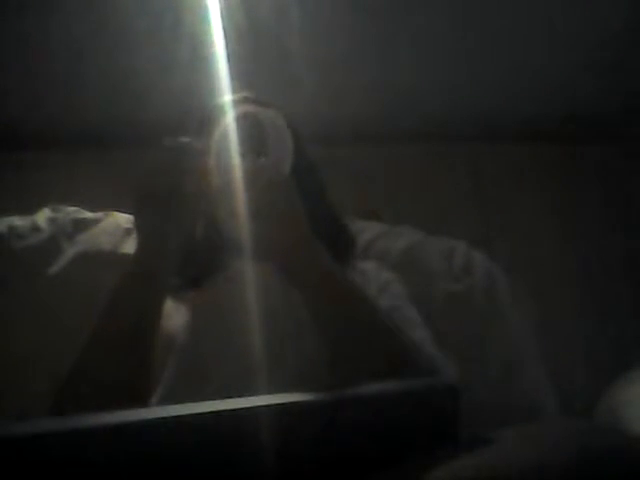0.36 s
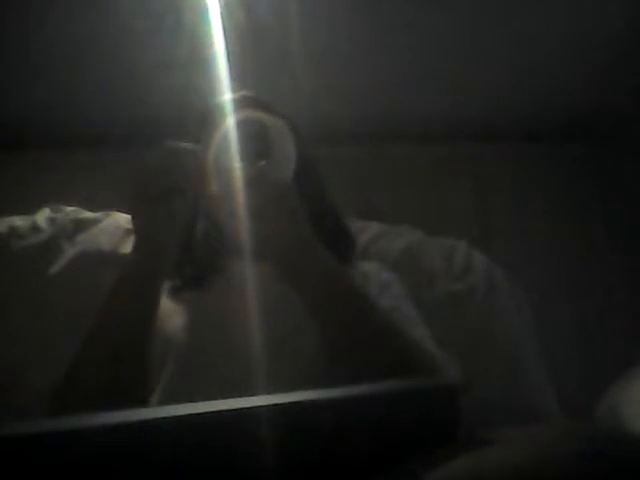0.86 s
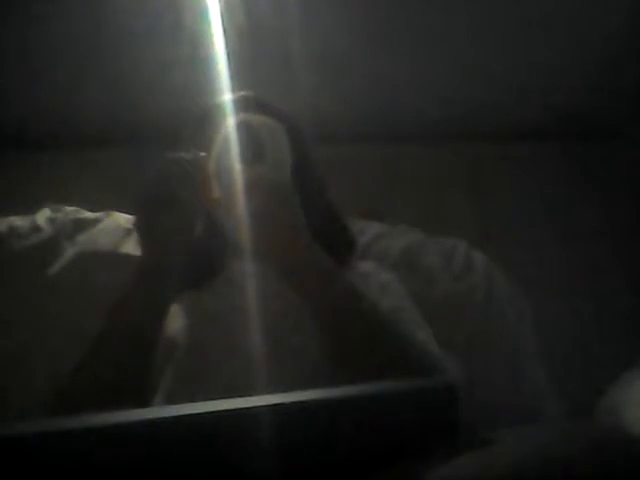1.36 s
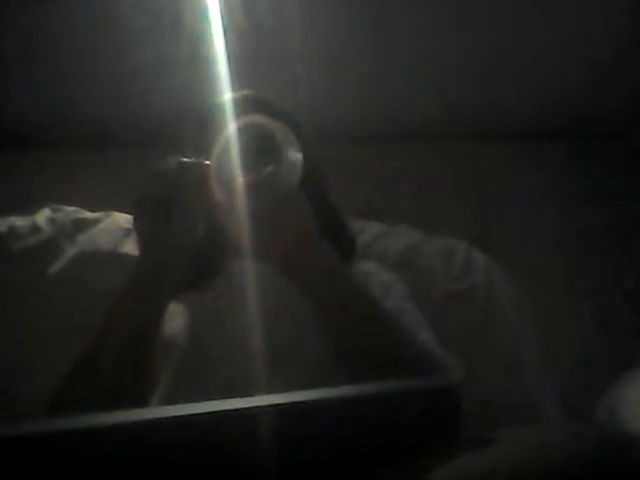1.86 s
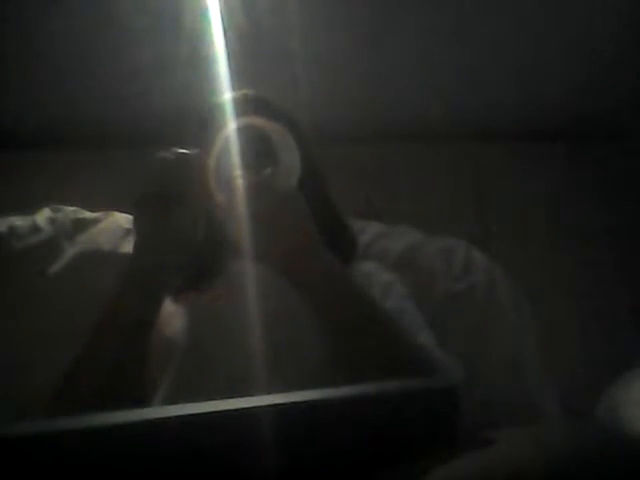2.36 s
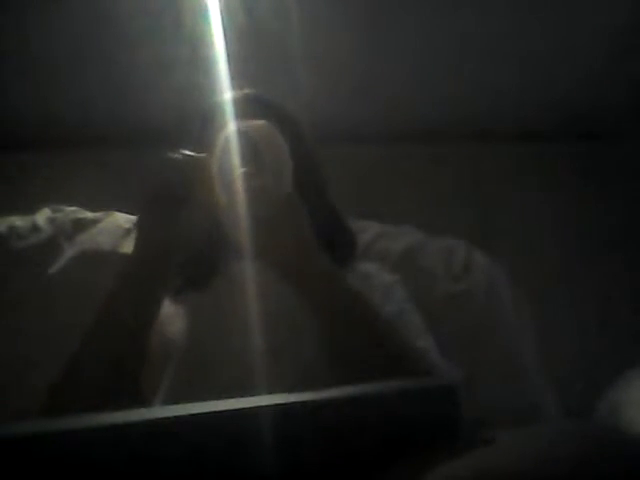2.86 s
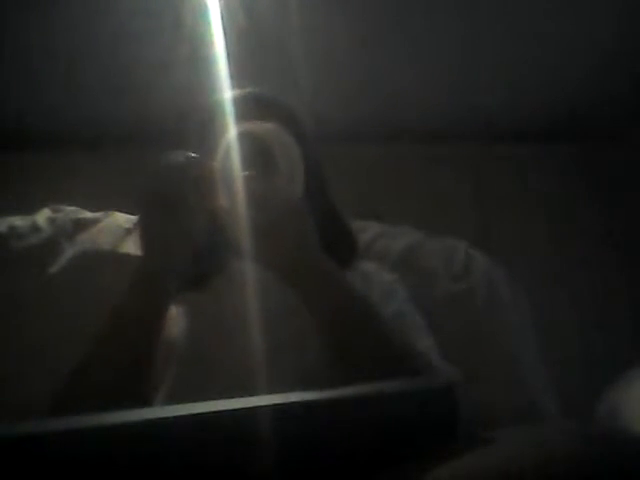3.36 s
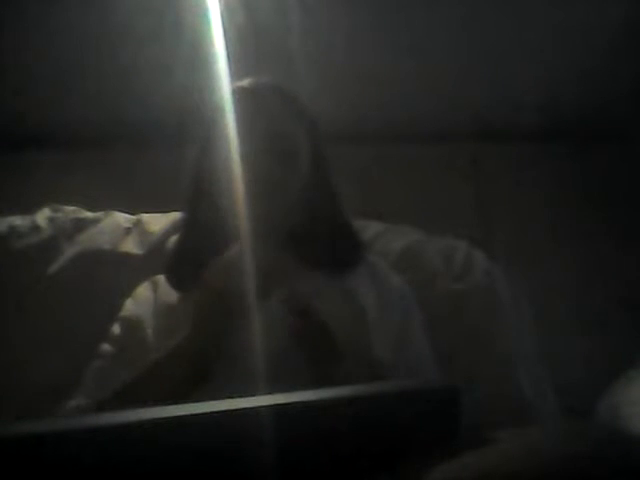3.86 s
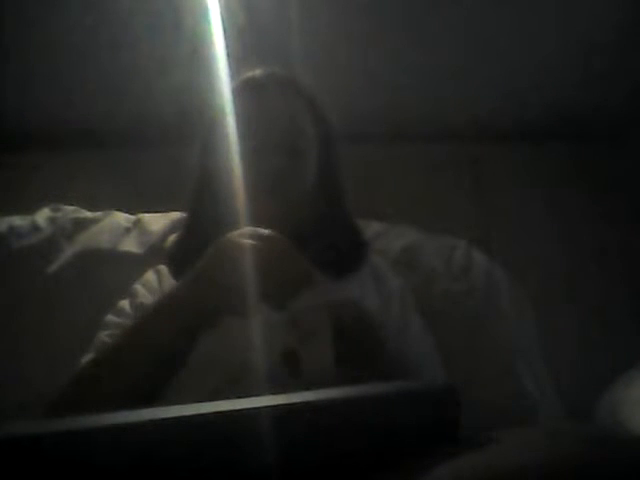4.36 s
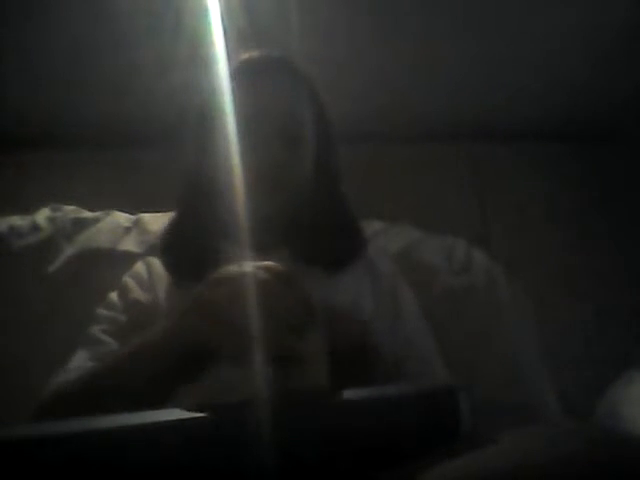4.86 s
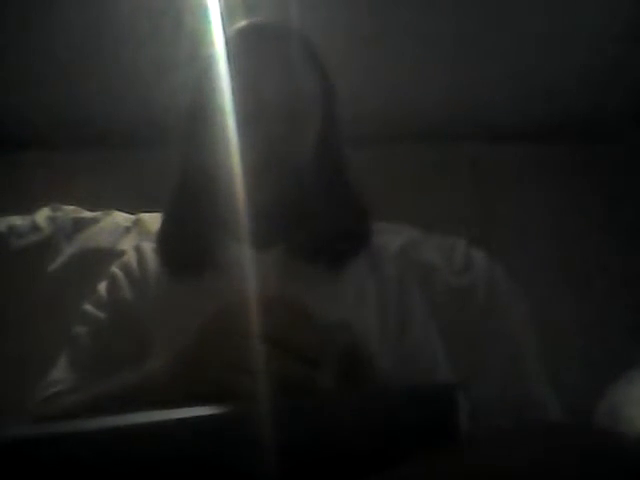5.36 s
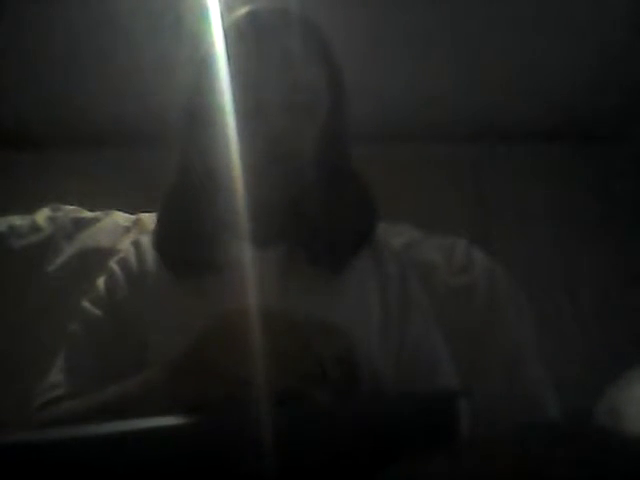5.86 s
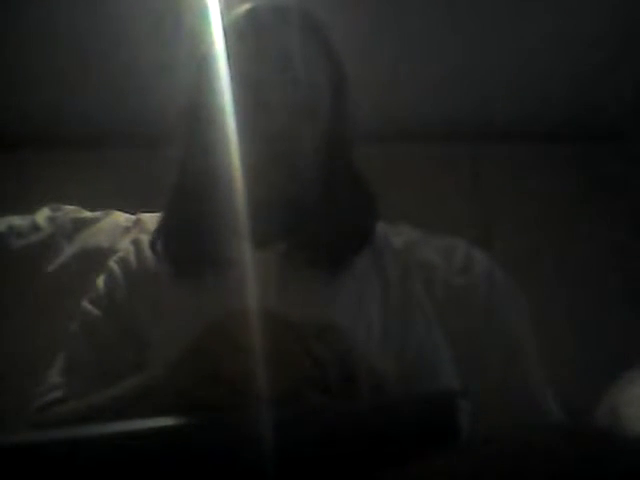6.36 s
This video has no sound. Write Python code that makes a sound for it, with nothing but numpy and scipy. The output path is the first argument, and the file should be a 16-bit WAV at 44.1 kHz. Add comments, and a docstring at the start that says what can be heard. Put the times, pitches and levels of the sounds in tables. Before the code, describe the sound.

Faint hiss and low hum, small tape clicks growing into crisp snips and one loud crackling snap, then light rustles and dull hollow knocks.

```python
"""A low hum and the hiss of a small two-port microphone run through a quiet room. Sticky tape is picked at,
peeled and snipped with scissors: each release of glue or bite of the blades is a noise burst that rings thin film
and tape roll, and a near wall throws it back. Faint rustles of loose film come among the snaps, and dense glue
crackle underlies three strong pulls. Then hands slide (random slips through resonances) and bump (decaying
modes and a rattle) on the hollow lap desk."""
import sys
import numpy as np
from scipy import signal
from scipy.fft import rfft, irfft, next_fast_len
from scipy.io import wavfile
from scipy.ndimage import uniform_filter1d

SR = 44100
rng = np.random.default_rng(int(sys.argv[2]) if len(sys.argv) > 2 else 0)


def makeup_ratio(level_db):
    """Linear amplitude ratio for a level in decibels (20 dB per factor of ten)."""
    decades = np.asarray(level_db, float) / 20
    return 10 ** decades


def store_pcm(level_fs):
    """Save levels as 16-bit WAV."""
    pcm = np.round(np.clip(level_fs, -1, 1) * 32767).astype(np.int16)
    wavfile.write(sys.argv[1], SR, np.atleast_2d(pcm).T)


N = 297410

# Broad spectrum of the thin film: (frequency [Hz], relative level [dB])
FILM_SPECTRUM = [(700, -43.5), (1500, -21), (3000, -14), (5000, -9.5), (6500, -4.5), (9300, -5),
                 (11500, -12.5), (14500, -10), (16000, -9.5), (16800, -34.5)]
# Modes of the tape roll: (frequency [Hz], width [Hz], relative level [dB])
ROLL_MODES = [(560, 126, -0.5), (1200, 360, -2), (1790, 240, -1.5), (2500, 1300, -2), (3310, 540, -2),
              (5000, 777, -2.5)]
# Modes of the hollow desk: (frequency [Hz], width [Hz], relative level [dB])
HOLLOW_MODES = [(520, 200, 5), (230, 120, 3.5), (386, 420, -1), (656, 170, -16.5)]
# Modes of the dry scrape on the desk: (frequency [Hz], width [Hz], relative level [dB])
SCRAPE_MODES = [(1250, 336, 6), (1580, 700, -2.5)]


def evened(x):
    """Power normalisation: scales to rms 1."""
    return x / np.sqrt(np.mean(x ** 2) + 1e-20)


def peaked(x):
    """Peak normalisation: scales to a largest magnitude of 1."""
    return x / abs(x).max()


def read(points, hz):
    """Interpolation of a spectrum on a logarithmic frequency axis."""
    f, value = np.transpose(points)
    return np.interp(np.log(hz + 1), np.log(f + 1), value)


def contour(tables, column=1, rest=-120.):
    """Piecewise-linear envelope: a column of several curves over time, at rest between them."""
    out = np.full(N, rest)
    for rows in tables:
        rows = np.array(rows)
        at = np.arange(round(rows[0, 0] * SR), min(round(rows[-1, 0] * SR), N))
        out[at] = np.interp(at / SR, rows[:, 0], rows[:, column])
    return out


def add(mix, s, sound):
    """Superposition: adds a sound to the mix in place, from time s."""
    part = mix[round(s * SR):][:len(sound)]
    part += sound[:len(part)]


def resonate(x, hz, width):
    """Resonance: one complex pole with a gain near 1 at its centre."""
    r = np.exp(-np.pi * width / SR)
    return 2 * signal.lfilter([1 - r], [1, -r * np.exp(2j * np.pi * hz / SR)], x).real


def ring(x, modes):
    """Modal superposition: two resonances in series for each mode leave dark valleys between modes."""
    body = 0
    for hz, width, db in modes:
        body = body + makeup_ratio(db) * resonate(resonate(x, hz, width), hz, 2 * width)
    return evened(body)


def coloured(x, points):
    """Minimum-phase filtering: the Hilbert transform of log gain gives a causal response."""
    hz = abs(np.fft.fftfreq(2048, 1 / SR))
    log_gain = np.log(makeup_ratio(np.maximum(read(points, hz), -80)))
    taps = np.fft.ifft(np.exp(np.conj(signal.hilbert(log_gain)))).real[:512]
    return signal.oaconvolve(x, taps)[:len(x)]


def clicks(per_s, spread_db):
    """Random impulse process: a few clicks much larger than the rest, power independent of the rate."""
    size = makeup_ratio(spread_db * np.minimum(rng.exponential(1, N), 4))
    strength = size * rng.standard_normal(N)
    occurs = rng.random(N) < per_s / SR
    return evened(strength * occurs / np.sqrt(per_s))


def swell(top_s, top_db, rise_s, fall_s):
    """Exponential growth and decay: gain climbs to its top and falls away, straight in dB."""
    t = np.arange(N) / SR - top_s
    # 10 dB below the top one rise before it and one fall after it
    return makeup_ratio(top_db - 10 * np.maximum(-t / max(rise_s, .002), t / max(fall_s, .002)))


def hum():
    """Periodic and narrow-band sound: a low machine tone of varying level, and a fainter wavering mains line."""
    # Machine tone: (time [s], rms level [dB])
    tone_levels = [(0, -70), (1.3, -73), (2.4, -66.5), (3.3, -65.5), (3.6, -62), (3.9, -63), (4.5, -59),
                   (5.25, -58), (5.5, -69), (5.9, -63), (6.3, -72), (6.74, -71.5)]
    # Mains line: (frequency [Hz], rms level [dB])
    mains = (100, -74)
    tone_hz = 39.5
    t = np.arange(N) / SR
    waver = evened(resonate(rng.standard_normal(N), mains[0], 3.3))
    tone = np.sqrt(2) * np.sin(2 * np.pi * tone_hz * t)
    return makeup_ratio(np.interp(t, *np.transpose(tone_levels))) * tone + makeup_ratio(mains[1]) * waver


def hiss():
    """Partial coherence: shaped room rumble and hiss, part shared by the ports and part each port's own."""
    # Noise spectrum: (frequency [Hz], relative level per hertz [dB])
    noise_spectrum = [(12, -38), (22, -7), (46, -1), (70, -13), (101, -8), (126, -11.5), (266, -16),
                      (478, -20), (519, -18), (631, -22.5), (1920, -20.5), (7500, -31.5), (8300, -34),
                      (8800, -32.5), (12500, -37), (15400, -31.5)]
    # Left-right coherence: (frequency [Hz], likeness [1])
    coherence = [(60, 0.89), (290, 0.93), (640, 0.65), (1400, 0.48), (3000, 0.25), (15000, 0.52)]
    rms_db, top_hz = -63.5, 15500
    frames, hz = N // 512 + 5, np.fft.rfftfreq(2048, 1 / SR)
    a, b, c, d, patches = rng.standard_normal((frames, 1025, 5)).T
    # slow level patches across frequency, then time
    patches = evened(uniform_filter1d(uniform_filter1d(patches, 24, 0), 8, 1))
    same = np.clip(read(coherence, hz), -1, 1)[:, None]
    left, other = a + 1j * b, c + 1j * d
    z = np.array([left, same * left + np.sqrt(1 - same ** 2) * other])
    z *= makeup_ratio(read(noise_spectrum, hz)[:, None] + 0.39 * patches) * (hz < top_hz)[:, None]
    noise = signal.istft(z, nperseg=2048, noverlap=1536)[1][:, :N]
    return makeup_ratio(rms_db) * evened(noise)


def snaps():
    """Impulsive excitation: a burst of tiny releases rings the thin film high and the tape roll low."""
    # Clear snaps, peaks before the bass cut and room: (time [s], film peak [dB], film resonance [Hz],
    # roll peak [dB], resonance of the part of the roll that is hit [Hz])
    snap_rows = [(1.7156, -45.5, 7800, -79, 520), (2.4336, -37.5, 6040, -47, 1490),
                 (2.4772, -46, 13500, -46.5, 2070), (2.6215, -40.5, 9250, -62, 520),
                 (2.6282, -37, 9100, -50.5, 2500), (2.6374, -42, 9300, -56, 2170),
                 (2.6473, -38, 8820, -53.5, 3200), (2.6519, -28.5, 9700, -51, 2610),
                 (2.6592, -40, 10000, -64, 520), (2.6628, -24.5, 9300, -66, 2830),
                 (2.6714, -27, 6650, -72, 2820), (2.6797, -38, 9660, -69, 2300),
                 (2.689, -40, 9370, -70, 3340), (2.9023, -50, 8800, -59, 2350),
                 (2.9562, -69, 5300, -44, 2300), (2.9705, -58, 9100, -51.5, 1200),
                 (2.9744, -54, 9100, -46.5, 2250), (3.293, -44.5, 9000, -73, 2570),
                 (3.4427, -45.5, 9500, -61, 1460), (3.4853, -23.5, 9010, -49.5, 3340),
                 (3.4975, -38.5, 13920, -63.5, 1700), (3.513, -21.5, 7570, -43, 3200),
                 (3.5219, -22.5, 6295, -42, 2840), (3.5374, -26, 6300, -31.5, 3090),
                 (3.5449, -25.5, 4980, -38, 2240), (3.5547, -31, 4150, -49, 3580),
                 (3.576, -34.5, 3947, -35, 2900), (3.5855, -25.5, 9400, -24, 2200),
                 (3.5946, -32.5, 10530, -31, 2420), (3.761, -16, 9350, -25, 1210),
                 (3.7895, -11.5, 6700, -18, 1790), (3.7941, -25, 9820, -25, 1700),
                 (3.7997, -12, 6600, -22, 3320), (3.802, -15, 6800, -16.5, 1145),
                 (3.8094, -14, 9130, -24.5, 1100), (3.8106, -12, 7450, -20, 1200),
                 (3.8238, -13.5, 7760, -20, 950), (3.9433, -45, 5000, -73, 520),
                 (3.9535, -36, 6570, -44.5, 540), (4.0125, -49, 6100, -48, 520),
                 (4.2424, -37, 6400, -46.5, 3050), (4.3735, -50, 7200, -62, 2860),
                 (4.6898, -38, 8700, -72, 520), (5.854, -52, 6300, -70.5, 684)]
    rise_s, fade_s = 0.00033, 0.0014  # exponential time constants
    out, t = np.zeros(N), np.arange(1500) / SR
    fade = np.exp(-t / fade_s)
    bursts = rng.standard_normal((len(snap_rows), 1500))
    for (s, film_db, film_hz, roll_db, roll_hz), burst in zip(snap_rows, bursts):
        burst = burst * fade * (1 - np.exp(-t / rise_s))
        film = ring(burst, [(film_hz, 1200.0, 0)]) + .7 * evened(coloured(burst, FILM_SPECTRUM))
        blow = 0.366 * fade * np.sin(2 * np.pi * roll_hz * t)
        struck = resonate(blow + burst, roll_hz, 500.0)  # the part that is hit
        roll = evened(struck) + 1.5 * ring(burst + 1.4 * struck, ROLL_MODES)
        add(out, s, makeup_ratio(film_db) * peaked(film) + makeup_ratio(roll_db) * peaked(roll))
    # small things radiate no bass
    return signal.sosfilt(signal.butter(2, 420, "high", fs=SR, output="sos"), out)


def room(x):
    """Reflection and reverberation: one strong wall echo, and sparse taps that die band by band."""
    # Reverberation time: (frequency [Hz], time to fall 60 dB [s])
    reverberation = [(300, 0.38), (1200, 0.1), (2500, 0.24), (5000, 0.17), (10000, 0.17), (16000, 0.17)]
    wall_s, wall_db, tail_db = .0106, -10, -6
    taps = np.zeros((2, SR // 2))
    at = np.arange(120, SR // 2 - 10, 10)
    at = at + rng.integers(0, 10, (2, len(at)))
    np.put_along_axis(taps, at, rng.choice([-1., 1.], at.shape), 1)
    hz, t, z = signal.stft(taps, SR, nperseg=128)
    apart = 2.1 * (hz / hz[-1])[:, None]  # the ports are close: tails differ more toward the treble
    z = np.array([z[0] + apart * z[1], z[0] - apart * z[1]])
    decay = makeup_ratio(-60 * t / read(reverberation, hz)[:, None])
    tail = signal.istft(z * decay, SR, nperseg=128)[1]
    tail *= makeup_ratio(tail_db) / np.linalg.norm(tail[0])
    tail[:, round(wall_s * SR)] += makeup_ratio(wall_db)
    return signal.fftconvolve(x[None], tail, axes=1)[:, :N]


def rustle():
    """Resonant filtering: sparse faint clicks ring the loose film, chiefly in a few treble bands."""
    # Swells: (time of the top [s], top rms level [dB], rise [s], fall [s])
    rustle_rows = [(2.45, -75, .02, .07), (2.985, -70, .05, 0.029), (3.95, -81, .01, 0.087),
                   (4.11, -75, 0.052, .05), (4.37, -73, 0.076, 0.11), (4.54, -68.5, 0.11, .07),
                   (4.76, -76, .05, .05), (4.92, -76, .08, 0.038), (5.13, -74, 0.16, 0.074),
                   (5.36, -75, .08, .15), (5.425, -68, 0.018, 0.049), (5.86, -77.5, .06, .08),
                   (6.15, -76, .15, 0.34)]
    # Modes of the loose film: (frequency [Hz], width [Hz], relative level [dB])
    loose_modes = [(5600, 900, -3.5), (7190, 920, -1), (9400, 1500, 0)]
    ticks = clicks(per_s=500, spread_db=2.5)
    film = ring(ticks, loose_modes) + 0.21 * evened(coloured(ticks, FILM_SPECTRUM))
    film = film + .15 * ring(ticks, ROLL_MODES)
    return sum(swell(*row) for row in rustle_rows) * evened(film)


def crackle():
    """Moving resonance: dense glue clicks ring film whose pitch follows its free length, and faintly the roll."""
    # Glue crackle under three strong pulls, one curve a pull:
    # (time [s], rms level [dB], film resonance [Hz])
    pulls = [
        [(2.622, -58, 9130), (2.648, -56.5, 9500), (2.665, -43, 9700), (2.685, -50, 9500), (2.70, -53, 9500),
         (2.72, -63, 9430)],
        [(3.486, -48, 9500), (3.51, -56.5, 10000), (3.514, -41, 7500), (3.527, -35, 6500), (3.55, -44.5, 5000),
         (3.572, -58, 4000), (3.586, -46, 2500), (3.635, -62, 2400)],
        [(3.7615, -46, 9160), (3.788, -52.5, 9500), (3.791, -34, 7000), (3.826, -40, 9000), (3.85, -51, 9500)],
    ]
    pull_db = contour(pulls)
    per_s = np.clip(7000 * makeup_ratio(0.42 * (pull_db + 45)), 2000, 14000)  # harder pulls free more glue
    glue = clicks(per_s, spread_db=1.0)
    # shift the moving pitch to 0 Hz, filter by a double pole there, and shift back
    turn = np.exp(2j * np.pi * np.cumsum(contour(pulls, column=2, rest=8000.)) / SR)
    r = np.exp(-np.pi * 2400. / SR)
    loose = (turn * signal.lfilter([1], [1, -2 * r, r ** 2], glue / turn)).real
    film = evened(loose) + .5 * evened(coloured(glue, FILM_SPECTRUM))
    return makeup_ratio(pull_db) * evened(film + 0.18 * ring(glue, ROLL_MODES))


def slide():
    """Frictional excitation: uneven skin slips excite the hollow desk and a dry scrape."""
    # Hand strokes: (time of the top [s], hollow rms level at the top [dB], rise [s], fall [s],
    # scrape relative to hollow [dB])
    strokes = [(3.87, -65, 0.014, 0.028, -8.5), (3.96, -67.5, 0.036, 0.036, -8),
               (4.06, -67.5, 0.073, 0.1, -9), (4.58, -59.5, 0.011, 0.18, -7.5),
               (4.85, -61.5, 0.087, 0.096, -5.5), (5.19, -59.5, 0.13, 0.062, -3.5),
               (5.35, -62.5, 0.075, 0.12, -19), (5.47, -63.5, 0.074, 0.034, 1.5),
               (5.6, -73.5, 0.16, .3, -15), (5.929, -64, 0.091, 0.017, -13)]
    slips = clicks(per_s=1200, spread_db=2.0)
    hollow, scrape = ring(slips, HOLLOW_MODES), ring(slips, SCRAPE_MODES)
    return sum(swell(*row[:4]) * (hollow + makeup_ratio(row[4]) * scrape) for row in strokes)


def bumps():
    """Modal decay: soft blows ring low, the upper modes dying sooner, and rattle the hollow desk."""
    # Bumps: (time [s], thud peak [dB], pitch [Hz], rattle peak [dB], scrape relative to hollow [dB])
    bump_rows = [(4.576, -49, 159, -44.5, -5), (4.595, -39.5, 510, -45, -3.5), (4.603, -38, 89, -50.5, -4),
                 (4.629, -45.5, 510, -62, -7), (4.689, -50, 1250, -58, 1), (4.751, -46, 522, -65, -7),
                 (4.857, -48.5, 171, -53.5, -7), (4.963, -50, 229, -64.5, -3), (5.143, -49, 1523, -51.5, 8),
                 (5.171, -42.5, 230, -51.5, -6), (5.317, -56, 570, -56.5, -12), (5.457, -46, 458, -56, 1),
                 (5.591, -50.5, 163, -59, -10.5), (5.896, -43.5, 109.3, -62, -15),
                 (5.918, -51, 134, -62, 3), (5.95, -39.5, 341, -47.5, -18), (6.014, -57, 181, -55.5, -4),
                 (6.085, -59.5, 198.6, -50.5, -8), (6.147, -53, 197, -53, -5), (6.193, -65, 272, -55, -4)]
    # Modes of a thud: (multiple of its pitch [1], relative level [dB])
    thud_modes = [(1, 5.5), (2.3, -0.5), (3.4, -9)]
    out, t = np.zeros(N), np.arange(6000) / SR
    shakes = rng.standard_normal((len(bump_rows), 6000))
    for (s, db, hz, rattle_db, scrape_db), shake in zip(bump_rows, shakes):
        t60 = 0.032 * (hz / 100) ** -0.17  # seconds; higher pitches die sooner
        thud = 0
        for k, mode_db in thud_modes:
            thud = thud + makeup_ratio(mode_db - 60 * t * k ** 0.66 / t60) * np.sin(2 * np.pi * hz * k * t)
        thud = thud * (1 - np.exp(-t / 0.0013))  # soft onset
        hollow = ring(shake * np.exp(-t / 0.018), HOLLOW_MODES)
        scrape = ring(shake * np.exp(-t / 0.017), SCRAPE_MODES)
        rattle = hollow + makeup_ratio(scrape_db) * scrape
        add(out, s, makeup_ratio(db) * peaked(thud) + makeup_ratio(rattle_db) * peaked(rattle))
    return out


def scene():
    """Direct and reflected sound over hum and hiss; the desk lies under the microphone and is drier."""
    tape, desk = snaps() + crackle() + rustle(), slide() + bumps()
    return tape + desk + room(tape + 0.33 * desk) + hum() + hiss()


def roll_off(x):
    """The treble ends steeply here."""
    return signal.sosfilt(signal.butter(12, 16810, fs=SR, output="sos"), x)


def record(dry):
    """Linear filtering: the right port is stronger around 5 kHz, the left above about 8 kHz; a steep low-pass."""
    # Port balance, before smoothing: (frequency [Hz], left over right [dB])
    port_balance = [(60, 0.5), (400, 1.3), (1500, 0.5), (3000, 0.5), (4500, -3.5), (6500, -4), (9000, 5.5),
                    (12000, 7), (15500, 9.5)]
    top_hz = 16600
    size = next_fast_len(N)
    hz = np.fft.rfftfreq(size, 1 / SR)
    balance_db = uniform_filter1d(read(port_balance, hz), size=9000)
    tilt_db = balance_db / 2 * np.array([[1], [-1]])  # half to each port, with opposite signs
    low_pass = 1 / (1 + (hz / top_hz) ** 200)
    mix = irfft(rfft(dry, size) * makeup_ratio(tilt_db) * low_pass, size)[:, :N]
    return roll_off(mix)


dry = scene()
out = record(dry)
store_pcm(out)
```